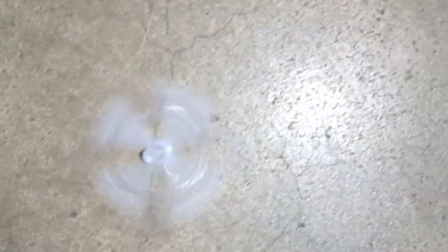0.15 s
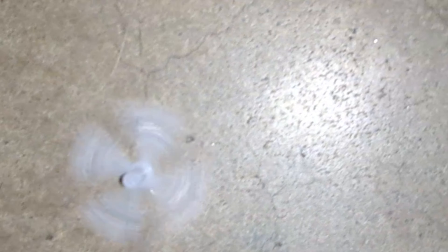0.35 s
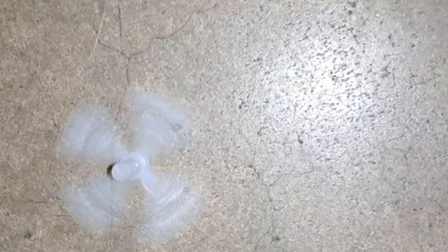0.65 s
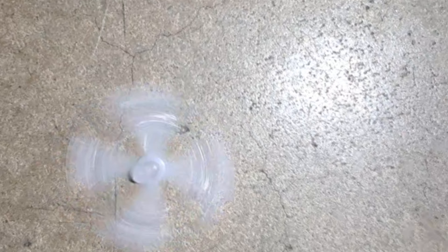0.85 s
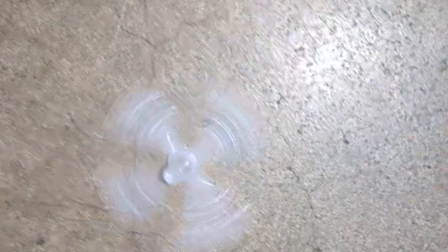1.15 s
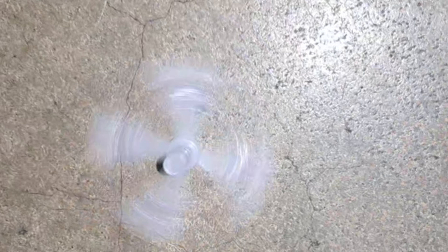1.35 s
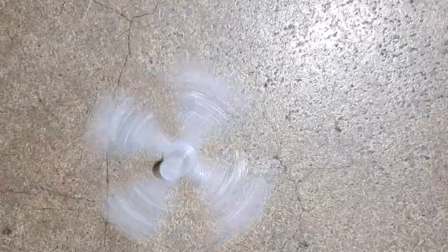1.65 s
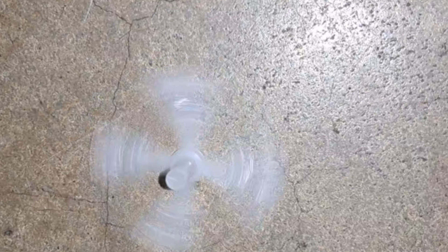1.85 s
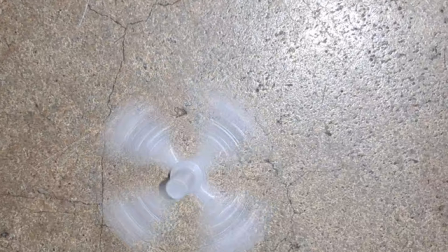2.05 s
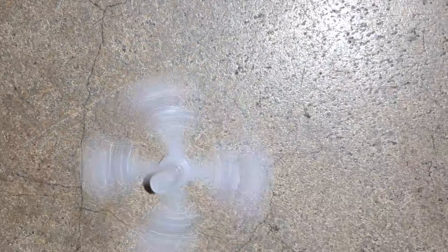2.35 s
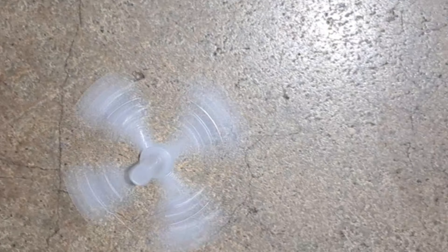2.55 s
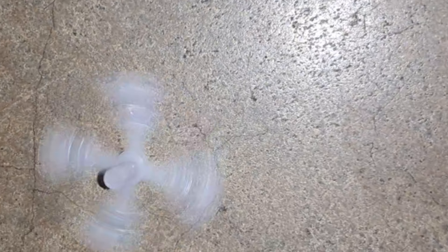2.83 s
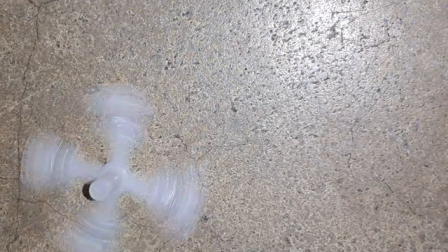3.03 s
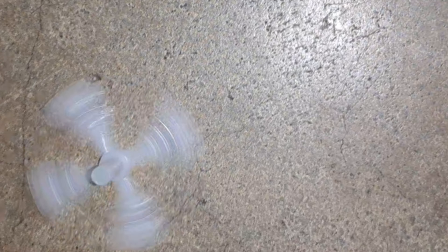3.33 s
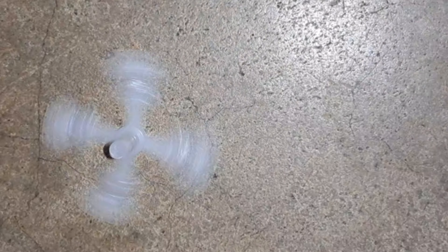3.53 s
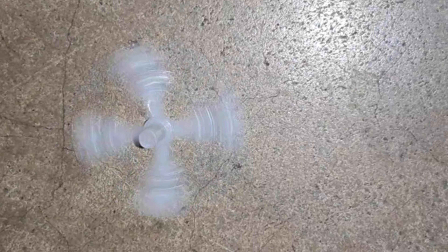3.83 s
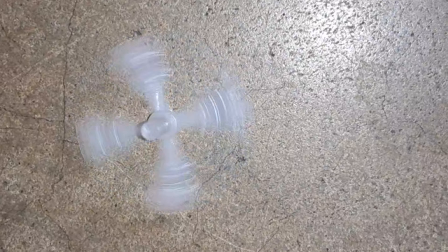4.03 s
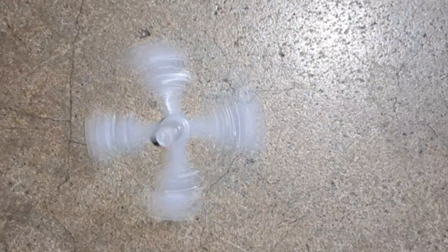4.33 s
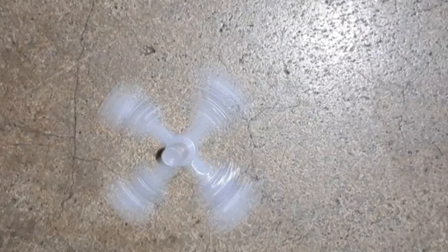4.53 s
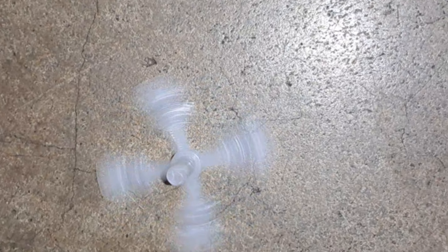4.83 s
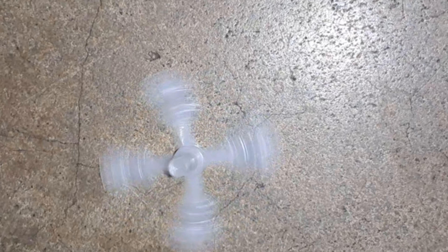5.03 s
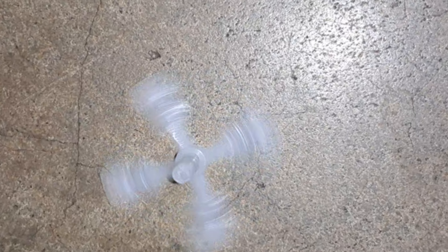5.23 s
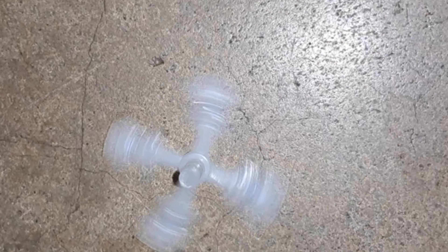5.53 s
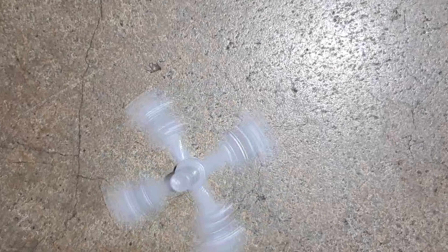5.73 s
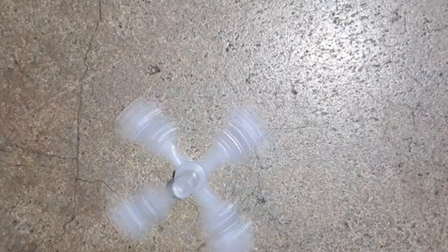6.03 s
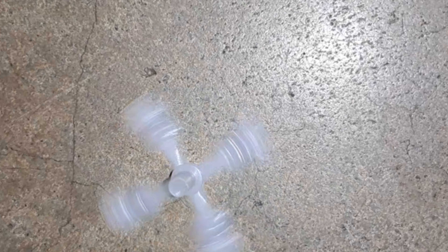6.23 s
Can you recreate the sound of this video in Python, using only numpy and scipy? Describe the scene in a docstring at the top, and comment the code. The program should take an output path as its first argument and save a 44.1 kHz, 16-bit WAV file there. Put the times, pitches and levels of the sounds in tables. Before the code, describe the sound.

In a bare, softly humming room, a hollow object knocks and rattles against concrete, each hit ringing briefly over sandy scrapes. The clatter gives way to two quick clusters of hard clacks, a faint high jingle of small metal pieces and some dull, distant knocks. Underneath, a spinning plastic toy rubs the floor with a barely audible whirr, close to a hand-held phone microphone.

```python
"""A bare room with a concrete floor, close to a hand-held phone. A plastic spinning toy whirrs faintly,
its tip rubbing the floor and its arms ringing. Something hollow clatters nearby: each blow rings its
body, cracks, throws sand and thuds into the floor. Dry clacks follow, then duller knocks further off.
Grit scrapes underfoot, small metal pieces jingle, and the room hums and answers every blow.
Nearly everything is noise, shaped by an envelope and coloured by resonances or a spectrum."""
import sys
import numpy as np
from scipy import signal
from scipy.fft import rfft, irfft, next_fast_len
from scipy.io import wavfile
from scipy.ndimage import uniform_filter1d, map_coordinates

SR = 44100
rng = np.random.default_rng(int(sys.argv[2]) if len(sys.argv) > 2 else 0)


def store_wav(level_fs):
    """Save 16-bit WAV to argv[1]."""
    pcm = np.round(np.clip(np.atleast_2d(level_fs), -1, 1) * 32767)
    wavfile.write(sys.argv[1], SR, pcm.T.astype(np.int16))


N = 281122
T = np.arange(N) / SR

# the hollow object's modes, four families from low to high: (pitch [Hz], width [Hz], level [dB])
HOLLOW_MODES = [
    [(754, 15, -1.5), (791.7, 16, 4), (863, 12, -3)],
    [(921, 18, 1), (1024.5, 11, 7), (1093.3, 18, 4)],
    [(1212, 25, 2), (1323, 25, 3), (1429, 34, -3.5), (1470, 15, -1.5), (1547, 35, -1)],
    [(1717, 30, -3), (1789, 22, 2), (1894, 26, 1)],
]
# its broad, dead shell tone: (centre [Hz], width [Hz], level [dB])
SHELL_BANDS = [(492, 250, 2), (1110, 1040, -2)]
# the floor's deeper and higher thud, one list each: (pitch [Hz], width [Hz], level [dB])
FLOOR_MODES = [(222, 47.5, 1)], [(276.3, 40, -1), (355, 81, -9)]
# lower and upper bands of a dull knock, one list each: (centre [Hz], width [Hz], level [dB])
KNOCK_BANDS = [(657, 1200, 5), (1180, 787, 12)], [(1617, 730, 3), (2140, 520, -5.5)]
# the colour of grit: (frequency [Hz], level [dB])
GRIT_SPECTRUM = [(1060, -30), (1800, -1), (2470, -3), (2810, -8), (4540, -5), (5400, -7.5), (7610, -9),
                 (10000, -24), (13000, -38.5), (22000, -120)]


def amp(db):
    return 10 ** (np.asarray(db) / 20)


def unit(x):
    return x / np.sqrt(np.mean(x ** 2) + 1e-20)


def wobble(rate):
    """A smooth random curve with `rate` knots a second."""
    return map_coordinates(rng.standard_normal(int(N * rate / SR) + 4), [T * rate])


def filtered(x, response):
    """Colour x with a frequency response, scaled so that white noise keeps its power."""
    size = next_fast_len(N + SR // 2)
    gain = response(np.fft.rfftfreq(size, 1 / SR))
    return irfft(rfft(x, size) * unit(np.abs(gain)) * np.exp(1j * np.angle(gain)), size)[..., :N]


def eq_curve(points):
    """A response through (frequency [Hz], level [dB]) points on a log axis."""
    hz, db = np.transpose(points)
    return lambda f: amp(np.interp(np.log(f + 1), np.log(hz + 1), db))


def modes(rows, low_hz, order=1):
    """Resonances of alternating sign with a two-pole bass cut; a higher order steepens it all."""
    def response(f):
        ring = sum((-1) ** k * amp(db) * 1j * f * width / (hz * hz - f * f + 1j * f * width)
                   for k, (hz, width, db) in enumerate(rows))
        return (ring * (1j * f / (low_hz + 1j * f)) ** 2) ** order
    return response


def noise(focus, grain_db=0, rate=300, patchy_db=0):
    """Stereo noise, `focus` of its power from one side; grain flickers the level, patchy the colour."""
    shared, left, right = rng.standard_normal((3, N + 512))
    direct = np.array([np.roll(shared, 5), shared])  # the left port hears it 5 samples late
    both = np.sqrt(focus) * direct + np.sqrt(1 - focus) * np.array([left, right])
    if patchy_db:
        spectra = signal.stft(both, nperseg=512)[2]
        patches = uniform_filter1d(rng.standard_normal(spectra.shape[1:]), size=2, axis=0)
        patches = uniform_filter1d(patches, size=11, axis=1)
        both = signal.istft(spectra * amp(patchy_db * unit(patches)), nperseg=512)[1]
    return unit(both[:, :N] * amp(grain_db * wobble(rate)))


def tails(times, db, t60, rise_s, pan_db=0):
    """Stereo envelope of blows that swell around their moment and die away; positive pan is left."""
    power, lead = np.zeros((2, N + 2 * SR)), SR // 20
    t = (np.arange(SR) - lead) / SR
    for start, level, decay, rise, pan in np.broadcast(times, db, t60, rise_s, pan_db):
        attack = .5 + .5 * np.tanh(t / rise)
        envelope = amp(level - 60 * np.maximum(t, 0) / decay) * attack
        power[:, round(start * SR):][:, :SR] += (envelope * amp([[pan / 2], [-pan / 2]])) ** 2
    return np.sqrt(power[:, lead:lead + N])


def strokes(times, hold, db, rest_db, rise, fall):
    """Envelope of gestures that rise, hold and fall above a resting level; slopes in dB per second."""
    t = T[::64]
    before = np.maximum(times[:, None] - t, 0)
    after = np.maximum(t - (times + hold)[:, None], 0)
    power = (amp(db[:, None] - rise * before - fall * after) ** 2).sum(axis=0) + amp(rest_db) ** 2
    return np.interp(T, t, np.sqrt(power))


def room():
    """A steady hum under swelling low room modes, with a low thump dying away at the start."""
    # noise bed of room and microphone: (frequency [Hz], level [dB])
    bed_spectrum = [(88, -33.5), (150, -1), (162, -17.5), (269, -11), (391, -21.5), (466, -19.5),
                    (820, -26), (870, -21), (1500, -29.5), (1630, -25.5), (3990, -35), (7910, -38),
                    (16000, -32.5)]
    # the lowest room mode, then the next ones up: (pitch [Hz], width [Hz], level [dB])
    deep_mode = [(49.7, 21, 0)]
    boom_modes = [(92.7, 16.7, -3), (126.5, 12, 1), (173, 46, -9.5)]
    # low swells of room and hand: (crest time [s], hold [s], deep [dB], boom [dB])
    swells = [(0.0, 0.0049, -57, -52), (0.192, 0.0082, -82, -64), (0.47, 0.018, -63, -59.5),
              (0.776, .02, -61, -66), (0.935, .01, -63, -58), (1.164, .01, -64, -59.5),
              (1.464, 0.12, -67, -58), (1.68, 0.04, -67, -67.5), (2.093, 0.041, -65, -58),
              (2.205, 0.044, -63, -70), (2.51, 0.035, -76, -51.5), (2.593, 0.097, -57, -51.5),
              (3.08, 0.026, -63, -69.5), (3.203, 0.026, -75, -64), (3.492, .04, -63, -68.5),
              (3.924, .02, -72.5, -68), (4.182, .01, -78, -66), (5.45, .01, -71, -63.5),
              (5.617, 0.022, -70, -74), (5.94, 0.021, -64, -79)]
    times, hold, deep_db, boom_db = np.transpose(swells)
    deep = strokes(times, hold, deep_db, rest_db=-77.5, rise=120, fall=190)
    boom = strokes(times, hold, boom_db, rest_db=-74, rise=120, fall=190)
    deep = deep * filtered(noise(0.81), modes(deep_mode, low_hz=35, order=2))
    boom = boom * filtered(noise(0.68, grain_db=3, rate=8.1), modes(boom_modes, low_hz=69.2))
    thump_hz, thump_db, thump_t60 = 125, -45, 0.23
    thump = amp(thump_db - 60 * T / thump_t60) * np.sin(2 * np.pi * thump_hz * T)
    bed = amp(-74) * filtered(noise(0.3, patchy_db=2), eq_curve(bed_spectrum))
    return bed + deep + boom + thump


def far_knocks():
    """Distant knocks, heard mostly as the room's answer: broad mid bands that flutter as they fade."""
    # (time [s], level [dB], upper band offset [dB], crack offset [dB], base t60 [s])
    knocks = [(3.433, -43, -13, -19.5, 0.4), (3.479, -50, -2, -13, 0.46), (3.643, -55.5, 1, -23, 0.22),
              (3.749, -70.5, 13, 4, 0.56), (4.092, -54.5, -8.5, -17, 0.84), (4.162, -60.5, 11, -9, 0.53),
              (4.219, -56, 6, -11, 0.3), (5.348, -40.5, 6.5, -24.5, 0.78), (5.39, -37, -8, -22.5, 0.75),
              (5.562, -52, 3.5, -9, .73), (5.59, -39.5, -9.5, -25, .41), (5.648, -52, -14, -2, 0.2),
              (5.682, -56.5, -11, 7, 0.27), (5.845, -43.5, -21, -22.5, .51), (6.081, -39, -11, -30.5, 0.6)]
    times, db, upper_db, crack_db, t60 = np.transpose(knocks)
    rise_s = 0.003
    lower = tails(times, db - 12.5, t60, rise_s, pan_db=0.012) * noise(0.5, grain_db=-2.5, rate=130)
    upper = tails(times, db + upper_db - 15.5, 0.75 * t60, rise_s, pan_db=-9.5)
    upper *= noise(1, grain_db=7.5, rate=82)
    crack = tails(times, db + crack_db + 0.5, 0.98 * t60, 2 * rise_s)
    crack *= noise(0.2, grain_db=0.5, patchy_db=3)
    return (filtered(lower, modes(KNOCK_BANDS[0], low_hz=350, order=2))
            + filtered(upper, modes(KNOCK_BANDS[1], low_hz=350, order=2))
            + filtered(crack, eq_curve(GRIT_SPECTRUM)))


def toy_whirr():
    """The spinning tip rubs the concrete and the toy's arms ring softly."""
    # level ride of the rubbing tip: (time [s], level [dB])
    ride = [(0, -73.5), (.1, -83), (.22, -73.5), (1.5, -68), (3.05, -71.5), (3.3, -74), (3.5, -64.5),
            (3.9, -88), (4.1, -75), (4.5, -94.5), (4.8, -78.5), (5.1, -93), (5.33, -75.5), (6.0, -73),
            (6.37, -82.5)]
    # the ringing arms: (pitch [Hz], width [Hz], level [dB])
    arm_modes = [(1120, 83, 0.5), (1350, 97, 1), (1960, 100, -6)]
    times, db = np.transpose(ride)
    friction = amp(np.interp(T, times, db)) * noise(0.47, grain_db=2, rate=46)
    return filtered(friction, modes(arm_modes, low_hz=700, order=1.6))


def floor_scrapes():
    """Grains of friction shake the hollow body, the grit and the floor; faint rubbing lies between."""
    # (crest time [s], hold [s], rattle [dB], grit [dB], sand [dB])
    scrapes = [(0.0, 0.0067, -71, -69, -75), (0.278, 0.059, -77, -95, -97), (0.442, 0.036, -76, -60, -87),
               (0.6, 0.027, -72, -65.5, -61.5), (0.891, 0.011, -42, -42.5, -51),
               (0.991, 0.021, -34, -63, -67), (1.15, 0.023, -38, -52, -83), (1.452, 0.034, -42.5, -55, -59),
               (1.561, 0.025, -43, -46.5, -47), (1.747, 0.018, -49.5, -56, -54),
               (2.028, 0.035, -86, -46.5, -51), (2.182, 0.17, -47, -55, -57.5),
               (2.36, 0.052, -64, -58, -52.5), (2.467, .17, -59, -55, -46.5), (3.07, 0.14, -62.5, -69, -87),
               (3.6, 0.074, -66, -74.5, -80), (4.15, 0.107, -73.5, -74, -70.5),
               (4.451, .1, -88.5, -97, -69), (5.498, 0.014, -75, -67, -77), (5.665, 0.011, -54, -63, -57),
               (5.888, 0.032, -62.5, -88, -99), (6.17, 0.037, -70, -82.5, -100)]
    # hiss of sliding sand: (frequency [Hz], level [dB])
    sand_spectrum = [(4120, -42.5), (7000, -4), (8150, -3), (9160, -15), (11800, -1), (13300, -7.5),
                     (15100, -9.5), (16000, -6.5)]
    times, hold, rattle_db, grit_db, sand_db = np.transpose(scrapes)
    drag_db = (rattle_db + grit_db) / 2 - 10.5  # the floor rumbles under rattle and grit
    shake = strokes(times, hold, rattle_db, rest_db=-86.5, rise=170, fall=132)
    rub = strokes(times, hold, grit_db, rest_db=-86, rise=170, fall=132)
    slide = strokes(times, hold, sand_db, rest_db=-90, rise=170, fall=230)
    pull = strokes(times, hold, drag_db, rest_db=-77.5, rise=170, fall=132)
    rattle = amp(-7) * shake * noise(0.29, grain_db=-1, rate=230, patchy_db=5.5)
    ring = amp(-7.5) * shake * noise(1, grain_db=1.5, rate=120)
    grit = rub * noise(0.048, grain_db=1, patchy_db=5.5)
    drag = pull * noise(0.8, grain_db=1.5, rate=23)
    sand = slide * noise(0.23, grain_db=1.5, patchy_db=4.5)
    return (filtered(rattle, modes(SHELL_BANDS, low_hz=300))
            + filtered(ring, modes(sum(HOLLOW_MODES, []), low_hz=395))
            + filtered(grit, eq_curve(GRIT_SPECTRUM))
            + filtered(drag, modes(FLOOR_MODES[0] + FLOOR_MODES[1], low_hz=118))
            + filtered(sand, eq_curve(sand_spectrum)))


def metal_jingle():
    """Every touch ticks and shakes the small metal pieces, which chatter on for a moment."""
    # (time [s], level [dB], mid offset [dB], low offset [dB], fizz offset [dB], base t60 [s])
    touches = [(0.16, -81, -11, 13, -13, .16), (0.225, -79.5, -13, 20, -4, 0.11),
               (2.81, -49.5, -15, -8, -8.5, 0.286), (3.2445, -63.5, -15, -7, -11.5, .28),
               (3.3236, -63.5, -9, -12, -21, .18), (3.42, -58, -12, -8, -15, .19),
               (3.4818, -64, -9, -8, -6, .14), (3.609, -63.5, -12, -14, -16, 0.26),
               (3.633, -48, -18, -17, -22.5, 0.22), (3.6796, -64, -14, 0, -16, 0.2),
               (3.719, -70, -14, 7, -12, .15), (3.7805, -60, -9.5, -2, -10, .18),
               (3.999, -61, -17, -5, -15.5, 0.34), (4.022, -47, -17, -14.5, -14, 0.16),
               (4.0696, -61, -11, -8, -11.5, 0.16), (4.2588, -60, -12, -9, -15, 0.28),
               (4.2994, -66, -7, -1.5, -12.5, 0.154), (4.394, -63, -13, -5, -2, 0.27),
               (4.432, -54.5, -27, -12.5, -15.5, 0.26), (4.4547, -60, -13, -14, -8, .21),
               (4.4994, -58.5, -10.5, -3, -5.5, .19), (4.5635, -56.5, -25, -16, -19, .18),
               (4.579, -44.5, -14, -17, -16.5, 0.2), (4.7476, -46, -38, -14.5, -15, 0.33),
               (4.7892, -54.5, -20, -2.5, -18.5, 0.18), (4.82, -50.5, -8, -14, -7, 0.19)]
    # the metal's ring in three registers: (pitch [Hz], width [Hz], level [dB])
    high_modes = [(10970, 180, -4.5), (11220, 100, -5), (11530, 50, 4), (11820, 70, 1.5),
                  (11700, 1050, -13.5)]
    mid_mode = [(10080, 40, 0)]
    low_modes = [(5250, 120, -1), (5640, 60, 4), (6065, 60, 5), (7900, 560, -3), (6200, 5300, -12.5)]
    # dense top modes blurring into fizz: (frequency [Hz], level [dB])
    fizz_spectrum = [(5000, -57), (8500, -29), (9420, -20.5), (11500, -8), (12800, -8.5), (16000, -8.5)]
    times, db, mid_db, low_db, fizz_db, t60 = np.transpose(touches)
    rise_s = 0.0027
    high = tails(times, db - 4.5, t60, rise_s) * noise(0.43, grain_db=-0.5, rate=60, patchy_db=6.5)
    mid = tails(times, db + mid_db - 2, 0.87 * t60, rise_s) * noise(0.4, grain_db=3, rate=92)
    low = tails(times, db + low_db - 4, 1.38 * t60, rise_s) * noise(0.21, grain_db=1.5, rate=77)
    tick = tails(times, db + low_db - 4, t60=0.028, rise_s=0.000537) * noise(0.45)
    fizz = tails(times, db + fizz_db + 2, 1.1 * t60, rise_s) * noise(0.4, grain_db=4, patchy_db=1.5)
    return (filtered(high, modes(high_modes, low_hz=6050))
            + filtered(mid, modes(mid_mode, low_hz=6000))
            + filtered(low, modes(low_modes, low_hz=3500))
            + filtered(tick, modes([(6900, 1800, 0)], low_hz=3500))
            + filtered(fizz, eq_curve(fizz_spectrum)))


def dry_clacks():
    """Hard little contacts: a brief pitched ring over a click and a short puff of room."""
    # (time [s], level [dB], pitch [Hz], click offset [dB], base t60 [s])
    contacts = [(2.832, -43, 930, -14, 0.18), (2.867, -41.5, 970, -6.5, 0.16), (2.883, -38, 1015, -8, 0.14),
                (2.915, -33, 2040, -6.5, 0.068), (2.932, -45.5, 1500, -7.5, 0.15),
                (3.031, -74, 1000, -20, 0.053), (3.044, -55, 890, -30, 0.31), (3.133, -36, 890, -15, 0.035),
                (3.145, -32.5, 1056, -39, 0.065), (3.165, -32, 755, -42, 0.065),
                (3.18, -36, 1064, -35, 0.11)]
    # snap of the contact: (frequency [Hz], level [dB])
    click_spectrum = [(1060, -29), (1800, 1), (2000, -2), (3230, -8.5), (5090, -16.5), (6470, -21.5),
                      (14000, -27.5)]
    times, db, hz, click_db, t60 = np.transpose(contacts)
    rings, t = np.zeros(N + SR), T[:SR // 8]
    attack = 1 - np.exp(-t / 0.00057)
    for start, level, pitch, decay in zip(times, db, hz, t60):
        tone = np.sin(2 * np.pi * pitch * t) + 0.17 * np.sin(2 * np.pi * 1.7 * pitch * t)
        rings[round(start * SR):][:len(t)] += amp(level - 6.5 - 60 * t / (0.7 * decay)) * attack * tone
    puff = tails(times, db - 10, 1.14 * t60, rise_s=0.007) * noise(0.28, grain_db=0.5)
    click = tails(times, db + click_db + 0.5, t60, rise_s=0.00022) * noise(0.13)
    return (rings[:N] + filtered(puff, modes(KNOCK_BANDS[0] + KNOCK_BANDS[1], low_hz=477))
            + filtered(click, eq_curve(click_spectrum)))


def hollow_clatter():
    """Each blow rings the modes near its favoured pitch, cracks, throws sand and thuds into the floor."""
    # (time [s], level [dB], crack offset [dB], deep thud offset [dB], high thud offset [dB],
    #  base t60 [s], rise [s], pan [dB], favoured pitch [Hz], ring offset [dB])
    blows = [(0.354, -58, -35, -25, -24, 0.2, .002, -8, 1820, 0.5),
             (0.402, -65, 4.5, -4, 10.5, 0.84, .007, -22, 1020, -8),
             (0.439, -64.5, 3.5, 4.5, 16.5, 0.4, .0025, -20, 1150, -3),
             (0.575, -63, 4, -18, -30, 0.5, .005, -2, 1290, 4),
             (0.709, -40.5, -9.5, -3.5, -19.5, 1, .005, -5.5, 1530, 0.5),
             (0.746, -31, -15.5, -7.5, -22, 0.18, .003, 3.5, 800, -4),
             (0.821, -35, -11, -19, -23.5, 1, .0015, -1.5, 1570, -0.5),
             (0.88, -24, -14, -31, -27.5, 0.31, .002, 0.5, 1209, 2),
             (0.912, -23.5, -24, -28, -26.5, 0.19, .003, -1, 1360, -4),
             (0.994, -24.5, -30.5, -37.5, -18, 0.27, .0015, -3, 1557, -5),
             (1.037, -38.5, -28, -26, -4, 0.69, .0025, 6, 835, -1),
             (1.121, -28, -17.5, -15.5, -13, 0.52, .0045, 2, 765, -0.5),
             (1.158, -24.5, -20.5, -22, -24, 0.3, .004, -1.5, 1200, -4.5),
             (1.331, -39, -18.5, -36, -30.5, 0.46, .003, 0.5, 960, -0.5),
             (1.402, -39.5, -6.5, -31.5, -31, 0.86, .0036, 0, 1370, -0.5),
             (1.421, -29, -11, -22, -20, .43, .003, 2.5, 900, 0),
             (1.444, -23, -14.5, -14, -25, 0.45, .003, -7.5, 1590, -2),
             (1.458, -20, -16, -25.5, -25, 0.59, .0036, 5.5, 800, -13),
             (1.547, -30.5, -9, -23.5, -28, 0.83, .003, 3.5, 1060, -7),
             (1.598, -27, -14.5, -13, -15, 0.2, .003, -0.5, 1060, -7),
             (1.755, -43.5, -13, -29, -11.5, 1, .003, -0.5, 1390, -5.5),
             (1.936, -64.5, -11.5, -20, -15, 0.23, .003, -8, 1850, 12.5),
             (2.008, -30.5, -4.5, -3, -31, 0.43, .006, 2.5, 1280, -2.5),
             (2.041, -25.5, -33, -9, -34, .39, .0036, -10.5, 1500, -14),
             (2.278, -34.5, -3.5, -19, -14.5, 0.69, .008, 1.5, 1390, -2.5),
             (2.32, -30, -17.5, -21, -11, .54, .006, -2, 780, -12.5),
             (2.376, -34, -9.5, -21, -23, 0.2, .0024, 6, 800, -2.5)]
    # the crack of impact and the spray of sand: (frequency [Hz], level [dB])
    crack_spectrum = [(1180, -28.5), (2000, -3), (2170, -13.5), (2480, -9), (2900, -10), (3920, -6),
                      (4390, -7.5), (5940, -11.5), (7740, -8.5), (9000, -40), (11700, -45.5), (19800, -120)]
    spray_spectrum = [(5000, -27), (8500, -2.5), (10300, -10), (11200, -1.5), (12700, -2.5), (14400, -6.5),
                      (16000, -13)]
    # the object's treble ring: (pitch [Hz], width [Hz], level [dB])
    rim_modes = [(2540, 30, -1.5), (4897, 400, -4.5), (6380, 180, -14.5), (7540, 41, -2.5)]
    times, db, crack_db, deep_db, high_db, t60, rise_s, pan_db, hz, ring_db = np.transpose(blows)
    shell = tails(times, db - 15, t60, rise_s, pan_db) * noise(0.54, grain_db=1, rate=360, patchy_db=3)
    out = filtered(shell, modes(SHELL_BANDS, low_hz=320))
    for family in HOLLOW_MODES:
        octaves_off = np.abs(np.log2(np.mean(family, axis=0)[0] / hz))
        ring = tails(times, db + ring_db - 15.5 * octaves_off - 5, 0.7 * t60, rise_s, pan_db)
        out += filtered(ring * noise(0.65, grain_db=1.5, rate=70), modes(family, low_hz=400))
    bright = tails(times, db + crack_db, 0.71 * t60, rise_s, 0.5 * pan_db)
    crack = amp(0.5) * bright * noise(0.38, grain_db=-1, rate=340, patchy_db=6)
    rim = amp(-11) * bright * noise(0.49, grain_db=2.5, rate=28)
    out += filtered(crack, eq_curve(crack_spectrum)) + filtered(rim, modes(rim_modes, low_hz=2010))
    spray = tails(times, db + crack_db - 5, 0.65 * t60, rise_s)
    out += filtered(spray * noise(0.3, grain_db=1, rate=370, patchy_db=2), eq_curve(spray_spectrum))
    for family, thud_db in zip(FLOOR_MODES, (deep_db, high_db)):
        thud = tails(times, db + thud_db - 7, 0.84 * t60, rise_s + 0.0055) * noise(0.92)
        out += filtered(thud, modes(family, low_hz=120))
    return out


def scene():
    """All the layers, summed in stereo."""
    return (toy_whirr() + hollow_clatter() + dry_clacks() + far_knocks() + metal_jingle()
            + floor_scrapes() + room())


def record(dry):
    """The phone's two ports each have their own colour, and nothing passes above its band limit."""
    # balance between the ports: (frequency [Hz], left over right [dB])
    port_balance = [(60, -3), (240, -2.5), (950, -3.5), (3770, -3.5), (15000, 1.5)]
    top_hz = 15830
    size = next_fast_len(N + SR // 2)
    hz = np.fft.rfftfreq(size, 1 / SR)
    ports = eq_curve(port_balance)(hz) ** np.array([[.5], [-.5]])
    return irfft(rfft(dry, size) * ports * (hz < top_hz), size)[:, :N]


dry = scene()
out = record(dry)
store_wav(out)
```